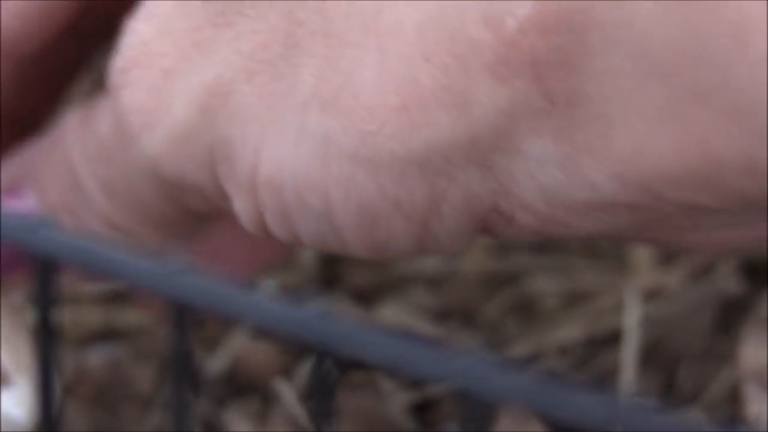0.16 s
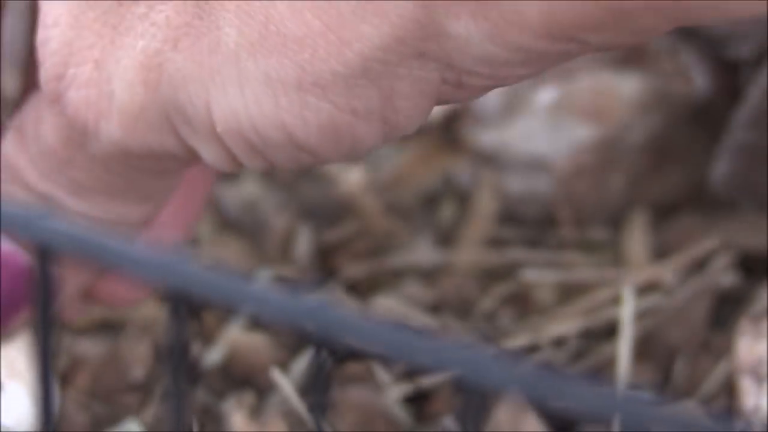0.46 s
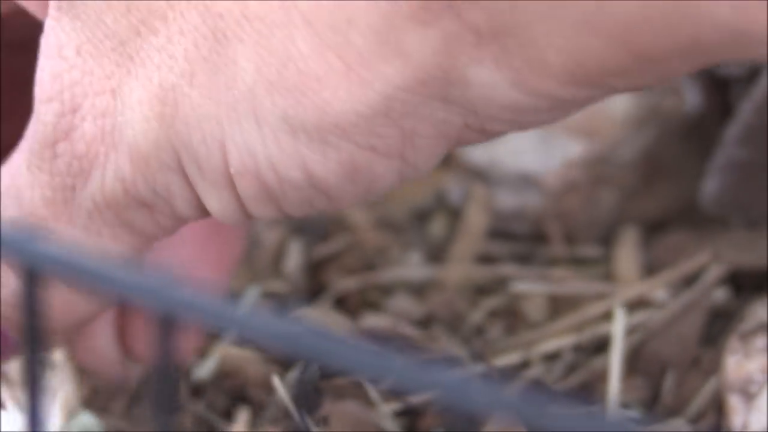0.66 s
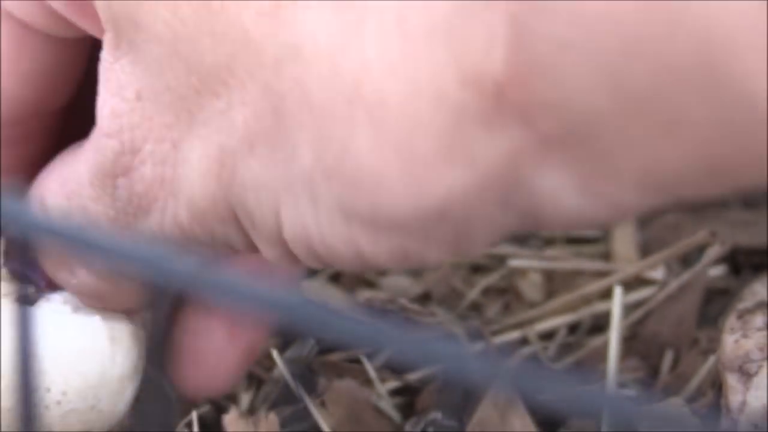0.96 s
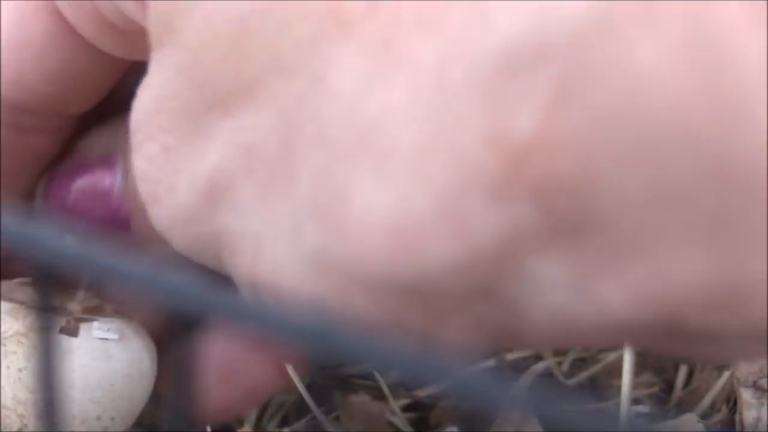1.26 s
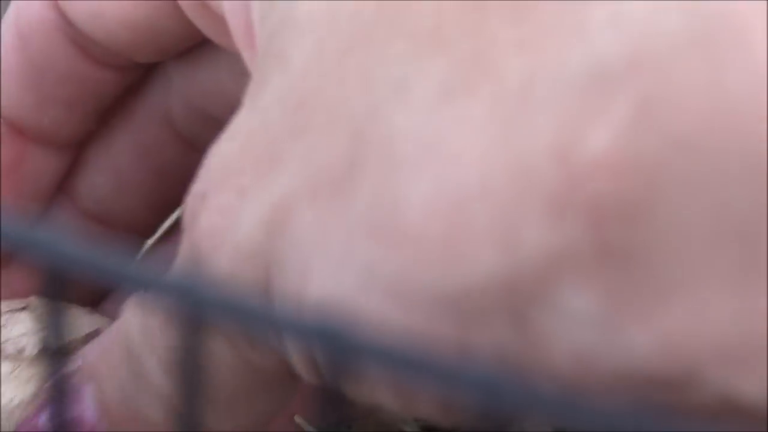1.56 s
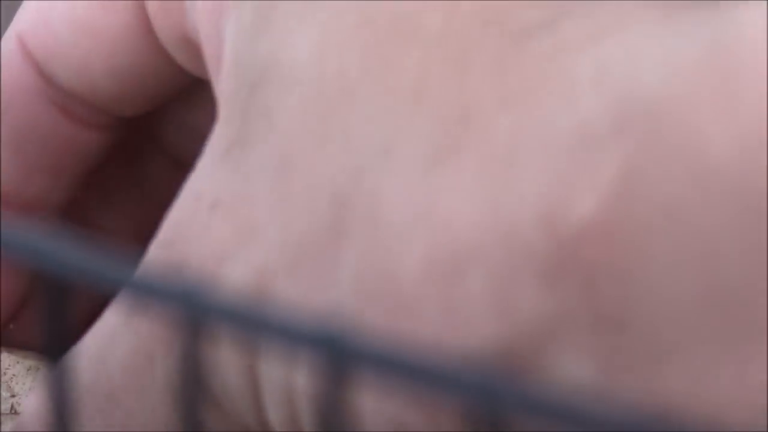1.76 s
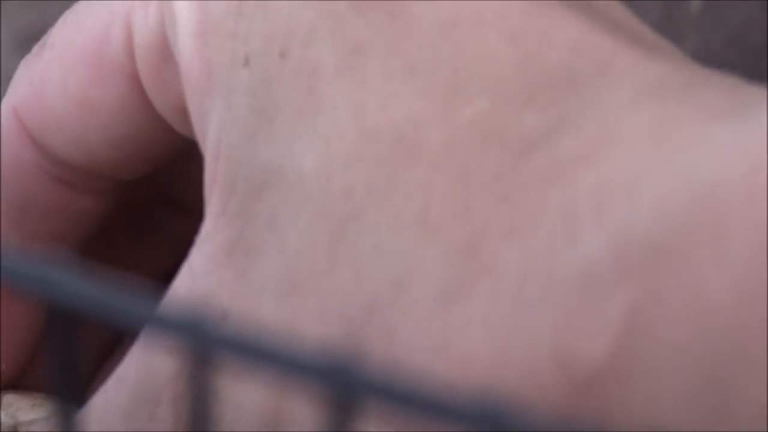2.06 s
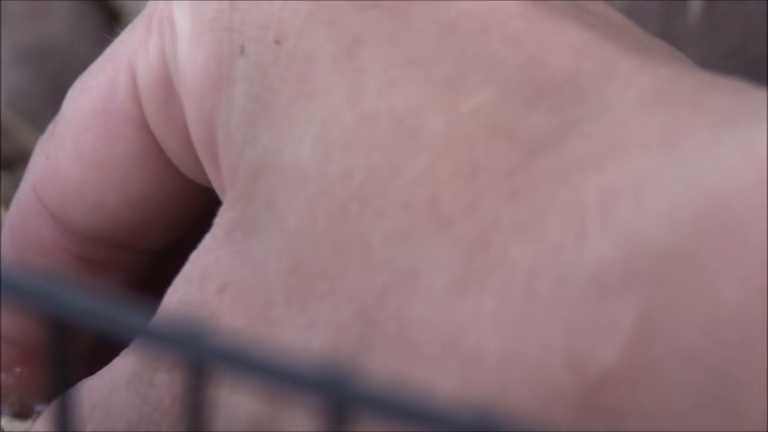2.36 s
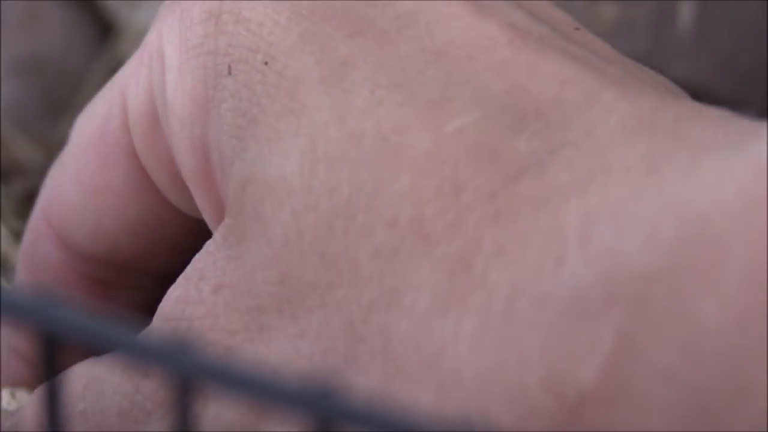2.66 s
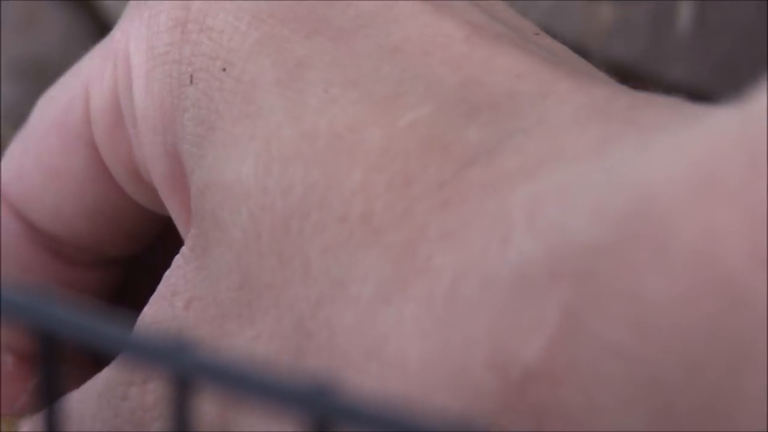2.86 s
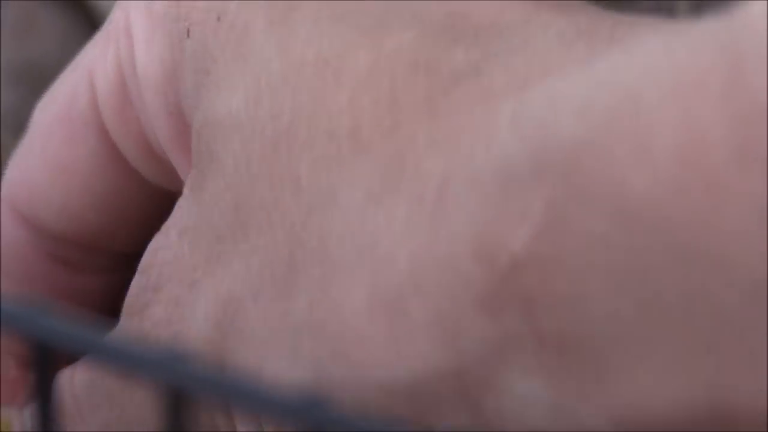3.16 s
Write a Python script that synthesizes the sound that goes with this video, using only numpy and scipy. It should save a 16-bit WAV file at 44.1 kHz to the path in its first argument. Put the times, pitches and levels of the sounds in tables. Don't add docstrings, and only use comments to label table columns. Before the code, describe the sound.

Cracked eggshell picked at by fingers, brittle snaps and crunches over rustling dry straw outdoors

```python
import sys
import numpy as np
from scipy import signal
from scipy.fft import rfft, irfft, next_fast_len
from scipy.io import wavfile
from scipy.ndimage import map_coordinates

SR = 44100
rng = np.random.default_rng(int(sys.argv[2]) if len(sys.argv) > 2 else 0)


def wav_record(signal):
    frames = np.transpose(np.atleast_2d(signal))
    bounded = np.clip(frames, -1, 1)
    quanta = np.round(bounded * 32767).astype(np.int16)
    wavfile.write(sys.argv[1], SR, quanta)


def how_loud(loudness_db):
    steps = np.asarray(loudness_db, float) / 20
    return 10 ** steps


N = 145530


def unit(x):
    return x / np.sqrt(np.mean(x ** 2) + 1e-20)


def along(points, hz):
    f, value = np.transpose(points)
    return np.interp(np.log(hz + 1), np.log(f + 1), value)


def filtered(x, response):
    size = next_fast_len(N + 8192)
    spectrum = rfft(x, size) * response(np.fft.rfftfreq(size, 1 / SR))
    return irfft(spectrum, size)[..., :N]


def coloured(x, spectrum):
    return filtered(x, lambda hz: how_loud(along(spectrum, hz)))


def wobble(rate):
    last = N * 60 / SR
    knots = rng.standard_normal(int(last) + 9)
    return map_coordinates(knots, [np.clip(np.arange(N) * rate / SR, 0, last)])


# (frequency [Hz], left lead [rad])
PORT_PHASE = [(100, 3.5), (345, -2), (520, -2), (700, -4.5), (1000, -4.5), (1400, -4.5), (7000, -5.5),
              (9500, -4.5)]


def ports(x, apart):
    left_db = 0.9
    direct = filtered(x, lambda hz: np.exp(.5j * np.outer([1, -1], along(PORT_PHASE, hz))))
    return (direct + apart) * how_loud([[left_db], [-left_db]])


# (time [s], peak level [dB], ring [Hz])
SNAPS_EARLY = [(0.5631, -31, 4040), (0.5826, -26, 3870), (0.5883, -10.5, 6500), (0.6257, -22.5, 2800),
               (0.6508, -27, 4800), (0.6843, -36, 2630), (0.9068, -24, 5590), (0.951, -24, 5400),
               (0.975, -19.5, 5430), (0.9969, -18, 3220), (1.0134, -24, 3420), (1.1273, -20.5, 5300),
               (1.1364, -23, 5600), (1.35, -25, 3350), (1.6183, -28, 3100)]
SNAPS_MIDDLE = [(1.7499, -26, 3910), (1.7564, -29, 2880), (1.7816, -29, 2680), (1.794, -21, 2730),
                (1.816, -23, 1980), (1.916, -18, 4800), (1.9298, -19.5, 5600), (1.949, -33, 2750),
                (2.0428, -21.5, 3080), (2.0817, -13.5, 4400), (2.116, -6.5, 4040), (2.1224, -12, 2900),
                (2.147, -11.5, 3060), (2.1614, -35, 3800), (2.2577, -15.5, 2870), (2.3426, -23, 5430),
                (2.362, -14.5, 4300)]
SNAPS_LATE = [(2.588, -38, 2525), (2.6234, -19, 5400), (2.7, -7, 14200), (2.704, -15.5, 7100),
              (2.7187, -13.5, 9850), (2.7307, -18, 5570), (2.7414, -18.5, 3580), (2.752, -22.5, 5200),
              (2.8067, -19.5, 2420), (2.827, -25, 2560), (2.8979, -11.5, 5520), (2.9047, -22, 5040),
              (2.9161, -18.5, 2560), (2.9305, -22, 6900), (2.9385, -12, 6250), (2.944, -25, 5140),
              (2.9638, -19.5, 5530), (3.091, -20.5, 2760), (3.1336, -25, 2550)]
# (time [s], peak level [dB], ring [Hz])
DOUBLE_SNAP = [
    (.6122, -21, 8800),
    (.6146, -17, 8900),
]
# (time [s], peak level [dB], ring [Hz])
SNAPS_MORE = [(0.403, -32, 4740), (0.5462, -39, 4160), (0.8096, -20, 4760), (0.8188, -16, 4850),
              (0.8332, -21, 5720), (0.8644, -34, 3560), (0.9963, -23, 3740), (1.0277, -30, 6150),
              (1.5494, -36, 4480), (1.5983, -35, 3960), (1.6664, -30.5, 6600), (1.7379, -33, 3880),
              (1.9446, -24, 3840), (2.1894, -26, 3890), (2.207, -28, 3840), (2.3254, -26, 3840),
              (2.4034, -26, 5520), (2.4614, -28, 5240), (2.485, -25.5, 5440), (2.5155, -23, 5520),
              (2.6757, -23, 6360), (2.7896, -28, 5480), (2.8073, -15, 5530), (2.827, -19, 4950),
              (2.9784, -20.5, 6600), (3.0444, -30, 6500)]
# (time [s], peak level [dB], ring [Hz])
SPLINTERS = [(0.6519, -20.5, 9200), (1.3848, -29.5, 9070), (1.5868, -32, 10200), (1.7499, -24, 10700),
             (1.7564, -27, 10600), (1.7804, -28, 10700), (1.948, -28, 9960), (2.58, -23, 13600),
             (2.588, -30, 9030), (2.6045, -26, 8500), (2.6678, -28, 9030), (2.8394, -19.5, 9840),
             (2.8853, -26, 8660), (3.0779, -32, 11500), (3.1153, -29.5, 9060), (3.1564, -34, 12000),
             (3.1657, -24, 11900)]
# (frequency [Hz], level [dB])
EDGE_COLOUR = [(600, -46), (2000, 11.5), (4000, -39), (9000, 3.5), (14000, 5), (17000, -3)]


def snaps():
    crack_s, ring_s, scatter_s = 0.005, 0.007, 0.022
    edge_db, scatter_db, extra_db = -13, -8, 1
    ring_q, spike = 3.4, 3.5
    length = 1024
    t = np.arange(length) / SR

    def decay(direct_s):
        start_db = np.array([[0], [scatter_db], [scatter_db]])
        return how_loud(start_db - 60 * t / np.array([[direct_s], [scatter_s], [scatter_s]]))

    rows = [*SNAPS_EARLY, *SNAPS_MIDDLE, *SNAPS_LATE, *DOUBLE_SNAP]
    rows += [(s, db + extra_db, hz) for s, db, hz in [*SNAPS_MORE, *SPLINTERS]]
    edge, body = np.zeros((2, 3, N + length))
    for s, db, hz in rows:
        start = round(s * SR) + 40
        at = slice(start, start + length)
        crack, push = rng.standard_normal((2, 3, length))
        push = push * decay(ring_s)
        push[0, 0] += spike
        ring = signal.lfilter(*signal.iirpeak(min(hz, 16000), ring_q, SR), push)
        edge[:, at] += how_loud(db + edge_db) * crack * decay(crack_s)
        body[:, at] += how_loud(db) * ring / np.abs(ring[0]).max()
    sound = coloured(edge[:, :N], EDGE_COLOUR) + body[:, :N]
    return ports(sound[0], sound[1:])


# (time [s], level [dB])
THUDS = [
    (0.82, -50),
    (2.123, -32),
    (2.923, -36),
    (3.117, -40),
]
# (time [s], level [dB], pitch [Hz])
KNOCKS = [(.564, -26, 2030), (1.696, -23.5, 1060), (1.757, -20.5, 1180), (1.8157, -21.5, 1096),
          (2.123, -16, 1120), (2.124, -29, 513), (2.922, -34, 480), (2.153, -20, 1096),
          (2.2598, -25.5, 1240), (2.747, -24.5, 1140), (2.828, -23.5, 1210), (2.843, -22.5, 1020),
          (2.92, -22, 764), (3.116, -27.5, 970)]
# (time [s], level [dB], pitch [Hz])
TAPS = [(0.706, -31, 1950), (0.759, -23, 1420), (0.782, -23, 2700), (0.795, -24, 2650), (0.819, -18, 1370),
        (1.11, -28, 1920), (1.737, -27, 1310), (1.9, -36, 2120), (1.978, -33, 1200), (1.988, -34, 2010),
        (2.082, -32, 1240), (2.344, -27, 1190), (2.406, -31, 1210), (2.444, -28, 830), (2.463, -25, 1400),
        (2.483, -29, 1420), (2.595, -24, 842), (2.705, -28, 1500), (3.04, -30, 1240), (3.064, -31, 1840)]


def thuds_and_knocks():
    thud_hz, thud_s, knock_s, tap_s = 294, 0.041, 0.025, 0.018
    tap_db = 3.5
    rows = [(s, db, thud_hz, thud_s) for s, db in THUDS]
    rows += [(s, db, hz, knock_s) for s, db, hz in KNOCKS]
    rows += [(s, db + tap_db, hz, tap_s) for s, db, hz in TAPS]
    out, t = np.zeros(N + 4096), np.arange(4096) / SR
    for s, db, hz, fall_s in rows:
        tones = np.sin(2 * np.pi * hz * t) + 0.1 * np.sin(2 * np.pi * 1.2 * hz * t)
        onset = 1 - np.exp(-t * hz / 0.4)
        out[round(s * SR):][:4096] += how_loud(db - 60 * t / fall_s) * tones * onset
    return ports(out[:N], 0)


def grains(per_s, spread_db):
    grain_s = 0.001
    sizes = how_loud(np.minimum(spread_db * rng.exponential(size=N), 11))
    starts = (rng.random(N) < per_s / SR) * sizes
    shape = np.exp(-np.arange(300) / (SR * grain_s))
    power = signal.fftconvolve(starts ** 2, shape ** 2)[:N]
    return unit(np.sqrt(np.abs(power)) * rng.standard_normal((3, N)))


# (frequency [Hz], level [dB])
STALKS_LOW = [(120, -36), (280, -8.5), (500, -11.5), (800, 0.5), (1200, 2), (2000, -1.5), (3000, -11.5),
              (6000, -38)]
# (frequency [Hz], level [dB])
STALKS_HIGH = [(1000, -59), (2500, -7.5), (4500, -7.5), (6800, -9), (8000, -14), (12000, -16),
               (15700, -25.5), (16000, -70)]


def rustle(per_s, spread_db, level_db, bright_db, apart_db):
    fine = grains(per_s, spread_db)
    low = coloured(fine, STALKS_LOW)
    high = coloured(fine, STALKS_HIGH)
    sound = how_loud(level_db) * (low + how_loud(bright_db) * high) / np.sqrt(np.mean(low ** 2))
    return ports(sound[0], how_loud(apart_db) * sound[1:])


# (peak time [s], build-up [s], release [s], level [dB], brightness [dB])
CRUNCHES = [(0.416, 0.025, 0.023, -39.5, 0), (0.636, 0.018, 0.024, -37.5, 3.5),
            (0.576, 0.0093, 0.029, -40, 0.5), (0.732, 0.064, 0.093, -33.5, 2.5),
            (.80, 0.051, 0.025, -34.5, -3), (0.823, 0.02, 0.0079, -31, 10),
            (.835, 0.0078, 0.0082, -34.5, 11), (1.128, 0.025, 0.0089, -44.5, 7.5),
            (1.43, 0.052, 0.012, -54.5, 13), (1.74, 0.11, 0.082, -40, -1),
            (1.819, 0.0041, 0.022, -37, -1.5), (2.123, 0.0067, 0.011, -28.5, 3),
            (2.151, 0.0052, 0.0068, -28, 1), (2.162, 0.0017, 0.0045, -36.5, 15),
            (2.345, 0.042, 0.015, -39.5, 3.5), (2.446, 0.11, 0.081, -39.5, -5.5),
            (2.517, 0.0071, 0.0034, -36.5, 0), (2.593, 0.0078, 0.024, -33, 0.5),
            (2.745, 0.028, 0.08, -41.5, 2.5), (2.828, 0.0069, 0.05, -38.5, 0.5),
            (2.929, 0.016, 0.056, -38.5, -1.5), (3.1, 0.088, 0.063, -43.5, -8),
            (3.165, 0.014, 0.022, -46, 4.5)]


def crunches():
    t = np.arange(N) / SR
    low_power, high_power = np.full((2, N), 1e-14)
    for s, rise, fall, db, bright_db in CRUNCHES:
        shape = how_loud(db) * np.exp(-((t - s) / np.where(t < s, rise, fall)) ** 2)
        low_power += shape ** 2
        high_power += shape ** 2 * how_loud(2 * bright_db)
    level_db = 10 * np.log10(low_power)
    bright_db = 10 * np.log10(high_power / low_power)
    return rustle(2600, 3.8, level_db, bright_db, apart_db=-2.5)


# (start [s], end [s], ring [Hz], level [dB])
SCRAPES = [
    (0.79, 1.09, 1830, -45.5),
    (0.795, 0.83, 2770, -32.5),
    (.69, 0.88, 2600, -40),
    (0.553, .62, 2020, -43.5),
    (.74, 0.84, 1040, -37.5),
    (2.39, 2.8, 6000, -49),
    (2.39, 2.53, 1210, -42),
]


def scrapes():
    ring_q, apart_db = 8, -2.5
    t, out = np.arange(N) / SR, np.zeros((3, N))
    fine = grains(2600, 3.8)
    for start, end, hz, db in SCRAPES:
        progress = np.clip((t - start) / (end - start), 0, 1)
        stroke = np.sqrt(np.abs(np.sin(np.pi * progress)))
        out += how_loud(db) * stroke * unit(signal.lfilter(*signal.iirpeak(hz, ring_q, SR), fine))
    return ports(out[0], how_loud(apart_db) * out[1:])


# (time [s], level [dB], brightness [dB])
STIR = [
    (0, -58, 12),
    (.3, -45, 0.5),
    (.52, -45, 2),
    (.9, -39.5, 0),
    (1.3, -46, 6.5),
    (2.2, -41, 3),
    (2.62, -41.5, 5.5),
    (3.3, -45.5, 6),
]


def straw():
    s, level, bright = np.transpose(STIR)
    t = np.arange(N) / SR
    level_db = np.interp(t, s, level) - 5.5 + 1.4 * wobble(13.27) + 0.12 * wobble(49)
    bright_db = np.interp(t, s, bright) + 0.14 * wobble(23.66)
    return rustle(2000, 3, level_db, bright_db, apart_db=1.5)


# (time [s], pitch [Hz], level [dB])
SQUEAK = [
    [(1.346, 3200, -56), (1.351, 3300, -43), (1.37, 3700, -43), (1.376, 3850, -33), (1.382, 3900, -33),
     (1.385, 3920, -60)],
    [(1.404, 3800, -44), (1.412, 3850, -34), (1.417, 3550, -45), (1.425, 3100, -47)],
    [(1.39, 4900, -54), (1.398, 4700, -46), (1.41, 4250, -52)],
    [(1.428, 4600, -52), (1.437, 4550, -47), (1.447, 4300, -54)],
    [(1.36, 7250, -52), (1.367, 7450, -46), (1.373, 7600, -54)],
]


def squeak():
    overtone_db, left_db = -20, 2.2
    t, out = np.arange(N) / SR, np.zeros(N)
    for part in SQUEAK:
        s, pitch, db = np.transpose(part)
        hz = np.interp(t, s, pitch) * (1 + 0.008 * wobble(58))
        turn = 2 * np.pi * np.cumsum(hz) / SR
        level_db = np.interp(t, s, db, left=-120, right=-120) + 0.56 * wobble(58.6)
        tones = np.sin(turn) + how_loud(overtone_db) * np.sin(2 * turn)
        out += np.sqrt(2) * how_loud(level_db) * tones
    return out * how_loud([[left_db], [-left_db]])


# (frequency [Hz], level [dB])
AIR_MID = [(12, -56), (20, -17.5), (162, -13), (601, -9.5), (863, -7.5), (939, -5), (15700, -25.5)]
# (frequency [Hz], level [dB])
AIR_SIDE = [(12, -61), (20, -42), (442, -18.5), (537, -13.5), (672, -14), (1020, -5.5), (15700, -64)]
# (time [s], level [dB])
AIR_RISE = [(0, -1), (1.2, 2), (3.3, 2)]


def air():
    mid, side = filtered(rng.standard_normal((2, N)), lambda hz: hz < 15900)
    mid = how_loud(-48.5) * unit(coloured(mid, AIR_MID))
    side = how_loud(-41) * unit(coloured(side, AIR_SIDE))
    rise_db = np.interp(np.arange(N) / SR, *np.transpose(AIR_RISE))
    return np.array([mid + side, mid - side]) * how_loud(rise_db)


def scene():
    shell = snaps() + thuds_and_knocks() + crunches() + scrapes()
    return shell + straw() + squeak() + air()


def low_pass(x):
    return signal.sosfilt(signal.butter(12, 16820, fs=SR, output="sos"), x)


# (frequency [Hz], level [dB])
ROLL_OFF = [(14500, -2), (15600, -8.5), (16700, -25), (16850, -90)]


def record(dry):
    mix = coloured(dry, ROLL_OFF)
    return low_pass(mix)


dry = scene()
out = record(dry)
wav_record(out)
```